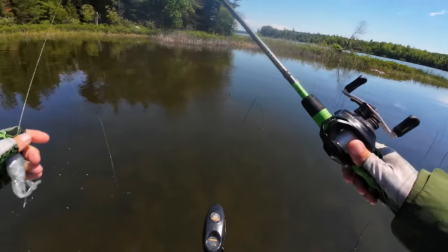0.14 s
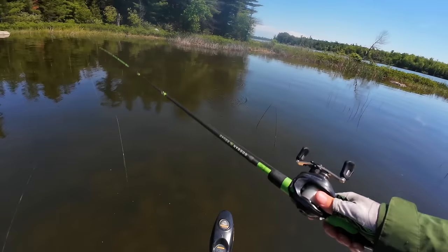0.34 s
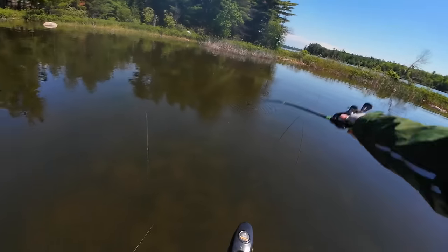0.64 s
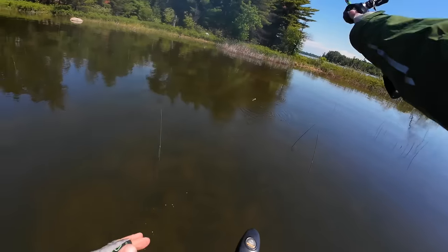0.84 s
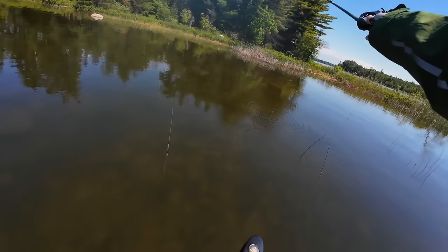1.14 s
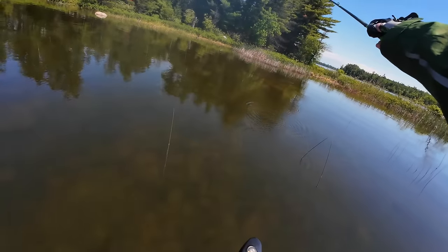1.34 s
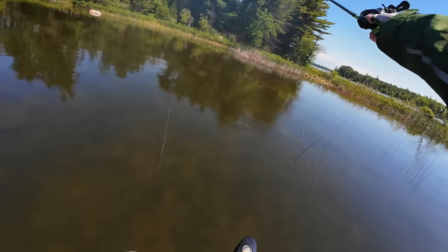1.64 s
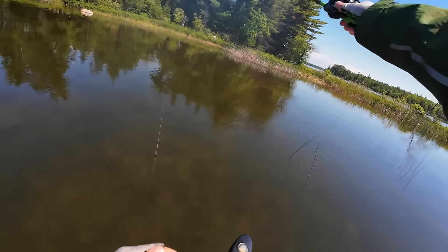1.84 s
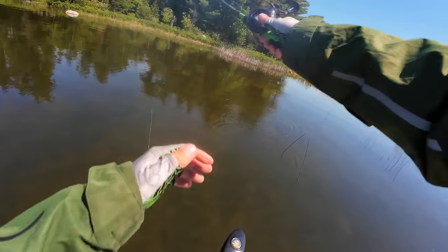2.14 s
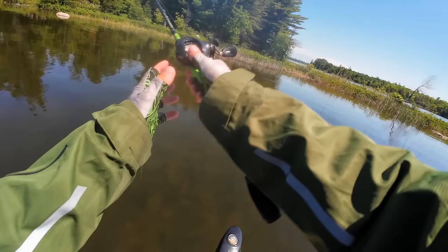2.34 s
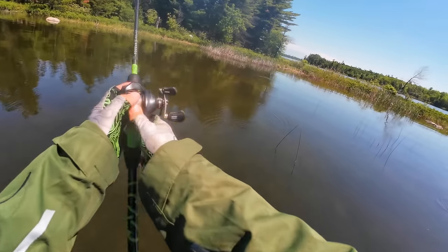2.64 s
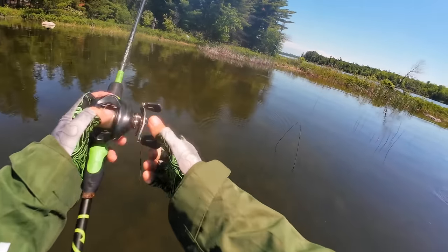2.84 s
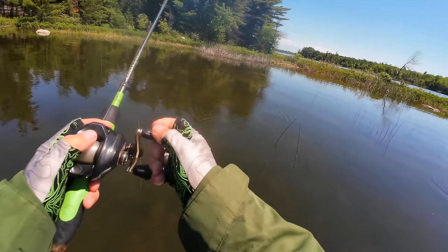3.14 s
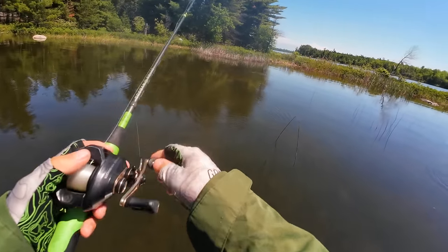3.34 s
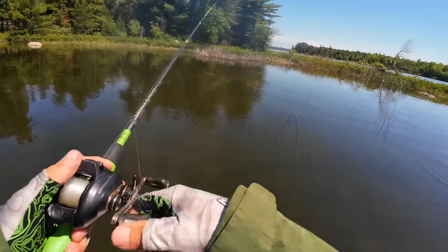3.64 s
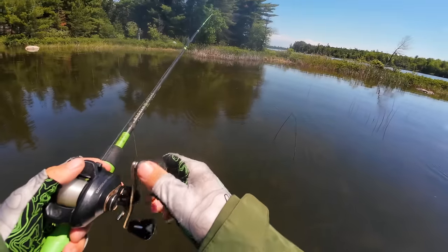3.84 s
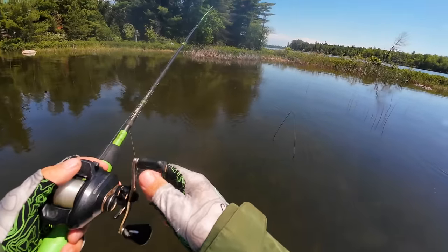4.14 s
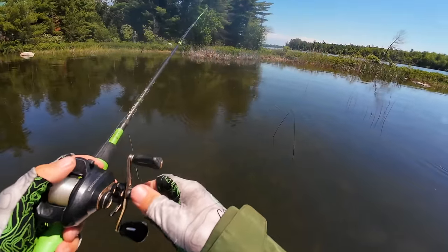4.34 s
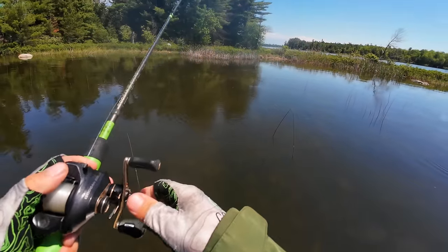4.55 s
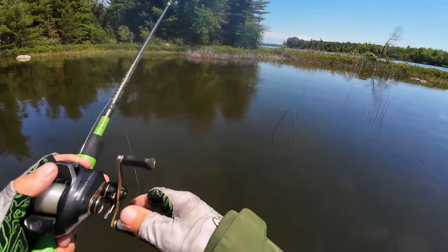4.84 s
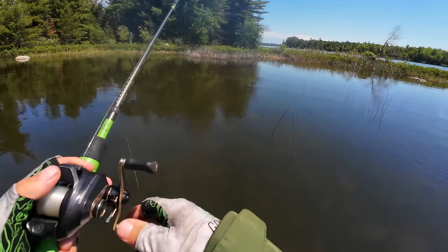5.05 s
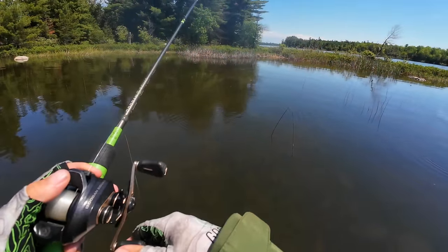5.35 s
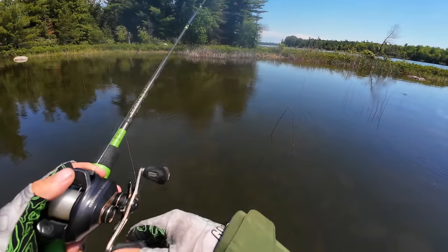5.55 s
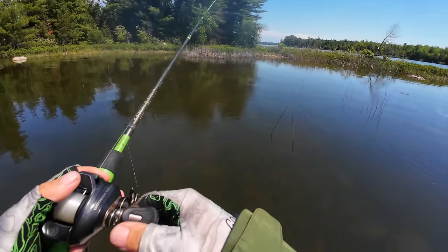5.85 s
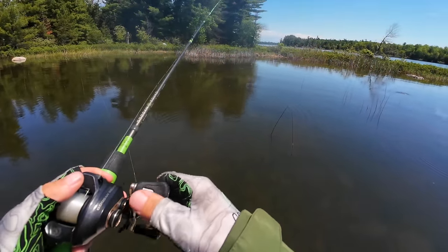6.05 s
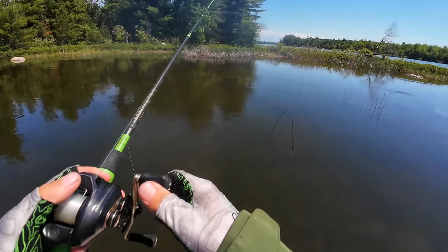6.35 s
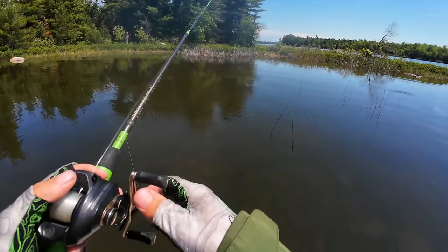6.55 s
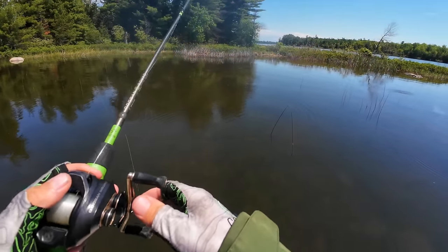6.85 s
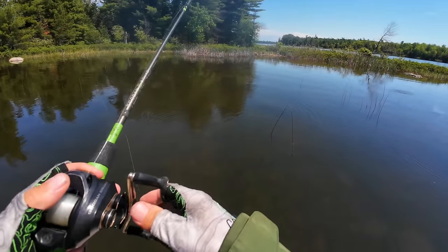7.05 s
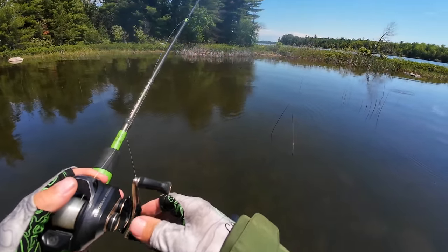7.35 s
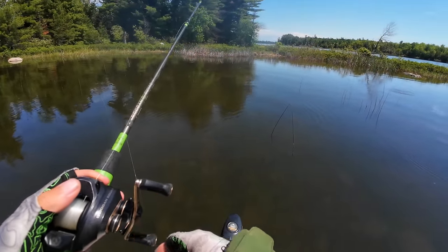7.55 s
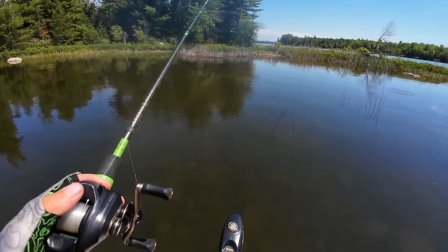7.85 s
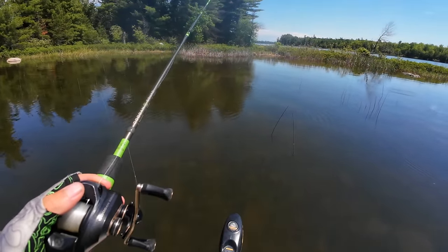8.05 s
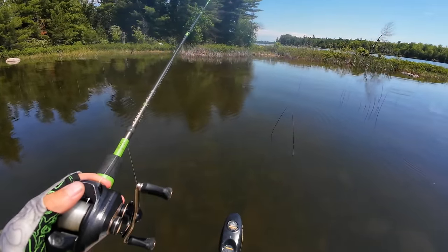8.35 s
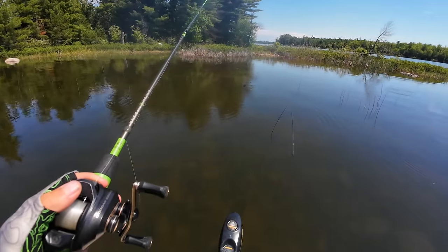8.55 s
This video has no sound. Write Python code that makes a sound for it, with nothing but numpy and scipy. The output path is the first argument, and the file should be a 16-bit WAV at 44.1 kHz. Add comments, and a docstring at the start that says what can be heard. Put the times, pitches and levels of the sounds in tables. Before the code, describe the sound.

A jacket rustles and a fishing rod swishes through a cast, with a dull thump against the body-worn microphone. Line hisses off the whirring spool for about a second. Fingers tap and sleeves shift, then the reel engages with one loud, sharp click. The lake turns quiet, and distant birds chirp and whistle quick two-note phrases over a faint low rumble, with a few light knocks.

```python
"""Casting on a still lake

A baitcasting rod is pitched from a boat, heard by a chest camera with two microphone ports.
Friction makes the jacket rustle and the line hiss off the spool under the thumb; impacts of fingers
and clutch ring the reel. Birds whistle on the wooded shore, which reflects their notes.
Air and body movement rumble in the ports."""
import sys
import numpy as np
from scipy import signal
from scipy.fft import rfft, irfft, next_fast_len
from scipy.io import wavfile
from scipy.ndimage import uniform_filter1d, map_coordinates

SR = 44100
rng = np.random.default_rng(int(sys.argv[2]) if len(sys.argv) > 2 else 0)


def persist_wave(psi):
    """Save psi, clipped to +-1, as 16-bit WAV."""
    counts = np.round(np.clip(psi, -1, 1) * 32767).astype(np.int16)
    wavfile.write(sys.argv[1], SR, np.atleast_2d(counts).T)


N = 383688
T = np.arange(N) / SR
IMPACT_T = T[:SR // 8]


def amp(db):
    """Decibels as an amplitude ratio."""
    return 10 ** (np.asarray(db) / 20)


def unit(x):
    """Normalisation to an rms of 1."""
    return x / np.sqrt(np.mean(x ** 2) + 1e-20)


def along(points, hz):
    """Interpolation of (frequency_hz, value) points on a logarithmic axis."""
    knots_hz, values = np.transpose(points)
    return np.interp(np.log(hz + 1), np.log(knots_hz + 1), values)


def curves(rows):
    """Linear envelopes, one for each column after the time."""
    times_s, *columns = np.transpose(rows)
    return [np.interp(T, times_s, column) for column in columns]


def wobble(rate_hz, n=N):
    """Smooth random modulation, n samples long."""
    return map_coordinates(rng.standard_normal(int(n * rate_hz / SR) + 4), [T[:n] * rate_hz])


def glide(pitches_hz, progress):
    """A parabolic glide through three pitches as progress runs from 0 to 1."""
    return np.polyval(np.polyfit([0, .5, 1], pitches_hz, 2), progress)


def add(track, start_s, sound):
    """Superposition of a sound on a track."""
    part = track[round(start_s * SR):][:len(sound)]
    part += sound[:len(part)]


def filtered(x, response):
    """Linear filtering by a complex frequency response."""
    size = next_fast_len(N + SR // 2)
    return irfft(rfft(x, size) * response(np.fft.rfftfreq(size, 1 / SR)), size)[..., :N]


def resonances(modes):
    """Frequency response of damped resonators summed with alternating sign."""
    return lambda hz: sum((-1) ** k * amp(db) * 1j * hz * width / (centre**2 - hz**2 + 1j * hz * width)
                          for k, (centre, width, db) in enumerate(modes))


def patchy(x, patch_db, bins, frames):
    """Spectral modulation: random gain patches, sized in 86 Hz bins and 6 ms frames."""
    spectra = signal.stft(x, nperseg=512)[2]
    field = uniform_filter1d(rng.standard_normal(spectra.shape[-2:]), bins, axis=0)
    field = uniform_filter1d(field, frames, axis=1)
    return signal.istft(spectra * amp(patch_db * unit(field)), nperseg=512)[1][..., :N]


def noise(spectrum, correlation, grain_db, patch_db):
    """Partly correlated stereo noise of rms 1; grain_db adds crackle, patch_db shifting bands."""
    grains = rng.standard_normal((2, N)) * amp(grain_db * wobble(640))

    def response(hz):
        angle = np.arccos(np.clip(along(correlation, hz), -1, 1)) / 2
        return amp(along(spectrum, hz)) * [np.cos(angle), np.sin(angle)]
    mid, side = filtered(patchy(grains, patch_db, bins=6, frames=9), response)
    return unit(np.array([mid + side, mid - side]))


# Share of the phase lead and shading that acts between the ports: frequency_hz, share
PORT_SHARE = [(4000, 0.08), (7000, 0.42), (9500, 0.41), (15000, 1)]

def ports(x, lead_rad, shade_db):
    """Path difference and shadowing: the left port's phase and level part from the right's in treble."""
    def response(hz):
        share = np.array([[.5], [-.5]]) * along(PORT_SHARE, hz)
        return amp(share * shade_db) * np.exp(1j * share * lead_rad)
    return filtered(x, response)


# Spectrum of the far shore: frequency_hz, gain_db
HUSH_SPECTRUM = [(40, -22), (60, 10.5), (130, -3), (280, -8.5), (550, -16.5), (1100, -21), (2400, -25),
                 (3500, -19), (4300, -22.5), (7000, -32.5), (11500, -28.5), (13300, -19.5), (14300, -33.5),
                 (15200, -67.5)]
# Its likeness at the two ports: frequency_hz, correlation
HUSH_CORRELATION = [(60, 0.44), (180, 0.2), (550, 0.2), (1650, 0.63), (4970, 0.54), (15000, -0.37)]

def shore_hush():
    """Distant sound arrives as nearly steady noise, only partly coherent between the ports."""
    hush = noise(HUSH_SPECTRUM, HUSH_CORRELATION, grain_db=-1.5, patch_db=2.1)
    return amp(-64.5 + 0.54 * wobble(12)) * hush


# Air and body movement on the ports: time_s, level_db
BUFFET_LEVELS = [(0.0, -42), (0.51, -49), (0.56, -35), (0.94, -38.5), (0.99, -37.5), (1.04, -39.5),
                 (1.43, -47.5), (1.65, -35.5), (1.79, -52.5), (1.84, -46), (2.3, -31), (2.35, -42),
                 (2.78, -46), (2.88, -35.5), (3.51, -53), (3.85, -44.5), (4.26, -55.5), (4.46, -40.5),
                 (4.56, -53), (4.68, -43), (4.72, -51.5), (7.17, -50.5), (7.27, -57), (7.8, -49.5),
                 (7.95, -32), (8.07, -38), (8.12, -47.5), (8.41, -43.5), (8.53, -54), (8.7, -42.5)]
# Spectrum of that pressure: frequency_hz, gain_db
BUFFET_SPECTRUM = [(8.8, -24), (15, 5.5), (36, -5.5), (45, -10), (59, -27), (92, -39), (200, -38.5),
                   (260, -54.5), (440, -120)]

def buffet():
    """Low pressure fluctuations, partly in antiphase; a stronger push favours the left port more."""
    db, = curves(BUFFET_LEVELS)
    pan_db = 5.5 + 0.7055 * (db + 53.5)
    balance = amp(np.array([pan_db, -pan_db]) / 2)
    lumps = amp(2.5 * wobble(12))
    rumble = noise(BUFFET_SPECTRUM, [(30, -0.5), (150, -0.19)], grain_db=-2, patch_db=0.5)
    return amp(db + 2) * lumps * balance * rumble


# Jacket movement: time_s, level_db, relative_treble_db
SLEEVE_LEVELS = [(0.0, -62, -3), (0.256, -70, 1.5), (0.39, -63, 0.5), (0.526, -63, -6.5), (0.744, -50, -3),
                 (0.824, -54.5, 14.5), (0.97, -58.5, 11), (1.04, -64, 4.5), (1.4, -72.5, 15.5),
                 (1.92, -69.5, 11), (1.954, -64.5, -0.5), (2.084, -57, 3), (2.226, -54, -2),
                 (2.746, -56, 7.5), (3.08, -61.5, 1.5), (3.17, -68.5, 3.5), (3.62, -56, 3.5),
                 (3.69, -60.5, -0.5), (3.95, -66.5, 6.5), (4.03, -73, -1.5), (4.45, -73, 8.5),
                 (4.68, -80, -10), (5.66, -72.5, 6), (5.89, -77.5, -6), (6.12, -79, 11.5),
                 (6.26, -79.5, -9.5), (7.4, -75.5, -8), (7.5, -74, 6.5), (7.56, -62, 1), (7.66, -56.5, 3.5),
                 (7.8, -58, 4), (7.97, -62, 5), (8.1, -71.5, 5), (8.31, -65, -6.5), (8.42, -69.5, -2),
                 (8.7, -73.5, -7.5)]
# Spectra of fabric folding, popping and sliding: frequency_hz, gain_db
FOLD_SPECTRUM = [(35, -42.5), (60, 9.5), (190, -10), (346, -6), (681, -8.5), (937, -8), (1810, -11),
                 (2910, -10.5), (7000, -21.5), (9100, -28.5), (15400, -120)]
CREASE_SPECTRUM = [(150, -38.5), (400, -3), (1000, -5), (2500, -15.5), (6000, -16.5), (12000, -44.5)]
SHEEN_SPECTRUM = [(3000, -46.5), (5000, -6), (7000, -10), (10000, -3.5), (13500, -2.5), (14500, -6),
                  (15600, -54.5)]

def sleeves():
    """Friction and buckling: coated fabric folds dully, pops at creases and slides with a sheen."""
    db, treble_db = curves(SLEEVE_LEVELS)
    folds = noise(FOLD_SPECTRUM, [(100, 0.37), (600, 0.85), (7000, 0.75)], grain_db=-1.5, patch_db=2.2)
    folds *= amp(db + 5.5 + 1.2 * wobble(30))
    pops_per_s = 120 * np.clip((db + 68) / 12, 0, 1)  # only brisk movement pops the creases
    sizes = amp(3 * np.minimum(rng.exponential(size=N), 2)) * np.clip(rng.standard_normal(N), -1.5, 1.5)
    pops = (rng.random(N) < pops_per_s / SR) * sizes
    creases = amp(db - 14.5) * unit(filtered(pops, lambda hz: amp(along(CREASE_SPECTRUM, hz))))
    sheen = noise(SHEEN_SPECTRUM, [(5000, 0.57)], grain_db=1, patch_db=3.5)
    sheen *= amp(db + treble_db - 1.5 + 1.3 * wobble(25))
    return (folds + creases) * amp([[.8], [-.8]]) + ports(sheen, lead_rad=-3.5, shade_db=-3.5)


def tick():
    """A broadband transient: differentiated noise, bright and quickly damped."""
    t = IMPACT_T
    envelope = np.clip(t / 0.00031, 0, 1) * amp(-60 * t / 0.026)
    return 0.86 * envelope * np.diff(rng.standard_normal(len(t) + 1))


def knock(hz, t60_s, attack_s, suboctave=0):
    """Impact excites a damped mode, a snap and a tick; the longer the ring, the weaker the snap."""
    t = IMPACT_T
    ring = amp(-60 * t / t60_s) * (np.sin(2 * np.pi * hz * t) + suboctave * np.sin(np.pi * hz * t))
    span = round(SR / (2.2 * max(hz, 900)))
    dull_noise = unit(uniform_filter1d(uniform_filter1d(rng.standard_normal(len(t)), span), span))
    snap = 0.0066 / t60_s * amp(-60 * t / 0.0095) * dull_noise
    return np.clip(t / attack_s, 0, 1) * (ring + snap) + amp(-29) * tick()


# Knocks of fingers, seams and buckles: start_s, level_db, pitch_hz
FINGER_TAPS = [(0.044, -38.5, 930), (0.137, -39.5, 1160), (0.405, -32.5, 590), (0.62, -34, 700),
               (0.677, -31.5, 500), (0.678, -38, 2420), (0.717, -28.5, 573), (0.719, -34.5, 3400),
               (0.7256, -23, 710), (0.754, -34.5, 600), (0.782, -35.5, 466), (0.9535, -23, 1100),
               (0.955, -38, 1696), (0.958, -31.5, 620), (1.079, -44.5, 990), (1.544, -42, 300),
               (1.664, -47, 500), (1.667, -51.5, 3500), (1.689, -53, 1400), (2.064, -32.5, 766),
               (2.2, -36, 860), (2.2019, -30, 1810), (2.239, -36, 910), (2.274, -37, 601),
               (2.348, -35, 848), (2.382, -36, 481.5), (2.412, -34.5, 440), (2.439, -32, 1780),
               (2.508, -26.5, 1510), (2.509, -36.5, 1010), (2.537, -35.5, 1500), (2.719, -34, 2040),
               (2.83, -32.5, 877), (2.854, -29.5, 1080), (3.451, -38.5, 1025), (3.579, -31, 990),
               (3.582, -34.5, 2290), (3.586, -35, 1710), (3.596, -40.5, 754), (3.708, -36, 2130),
               (3.708, -37, 804), (4.128, -48.5, 1500), (4.504, -43, 600), (8.307, -33.5, 1110)]

def taps():
    """Heavily damped impacts, each ring dying within ten cycles."""
    out = np.zeros(N)
    for start_s, db, hz in FINGER_TAPS:
        add(out, start_s, amp(db) * knock(hz, t60_s=min(0.0077, 9.6 / hz), attack_s=0.0014))
    return ports(out, lead_rad=4.6, shade_db=-10)


# Arm and strap bumping the camera: start_s, level_db, nominal_pitch_hz, decay_cycles
CAMERA_BUMPS = [(0.472, -40.5, 223, 10.5), (0.671, -22, 190, 1), (0.737, -9, 111, 1.5),
                (0.75, -22, 147, 8.5), (0.781, -29.5, 362, 14.5), (0.949, -35, 241, 15),
                (1.311, -37, 75, 7), (1.335, -29.5, 79, 7.5), (1.462, -33.5, 99, 9), (1.488, -23.5, 124, 8),
                (2.224, -36, 300, 4), (2.238, -31, 298, 6), (2.296, -29, 350, 6), (2.45, -32, 151, 6),
                (2.465, -29, 219, 6), (2.54, -31.5, 110, 5.5), (3.327, -36, 229, 5),
                (3.862, -31.5, 72.4, 9.5)]

def thumps():
    """Soft impacts give low damped oscillations that sag in pitch, stronger at the left port."""
    out, t = np.zeros(N), T[:SR // 5]
    for start_s, db, hz, decay_cycles in CAMERA_BUMPS:
        t60_s = decay_cycles / hz
        sag = 0.62 + 0.59 * np.exp(-t / (0.2 * t60_s))
        cycles = np.cumsum(hz * sag * (1 + 0.086 * wobble(67, len(t)))) / SR
        attack = np.clip(t / (0.099 * t60_s), 0, 1)
        decay = amp(db - 60 * t / t60_s + 2.06 * wobble(84, len(t)))
        add(out, start_s, -attack * decay * np.sin(2 * np.pi * cycles))
    return out * amp([[2.5], [-2.5]])


# Cloth sliding over an air pocket: start_s, length_s, first_hz, middle_hz, last_hz, level_db
CUFF_SLIDES = [(0.56, 0.304, 299.4, 380, 327, -46.5), (1.549, .04, 350, 404, 350, -57),
               (7.481, 0.26, 420, 560, 750, -61), (7.601, 0.3, 1080, 1014, 721, -51),
               (7.598, 0.3, 1750, 1700, 1615, -59), (8.166, 0.094, 650, 620, 695, -55),
               (8.197, 0.11, 2300, 2240, 2070, -59.5), (8.249, 0.091, 1148, 1120, 1100, -62),
               (8.45, 0.13, 264, 253.5, 220, -55)]

def cuff(width_hz=260):
    """Cavity resonance: narrowband noise follows the pitch of the air pocket, swelling and fading."""
    out = np.zeros(N)
    for start_s, length_s, *pitches_hz, db in CUFF_SLIDES:
        n = round(length_s * SR)
        progress = np.linspace(0, 1, n)
        phase = 2 * np.pi * np.cumsum(glide(pitches_hz, progress)) / SR
        band = wobble(width_hz, n) * np.cos(phase) + wobble(width_hz, n) * np.sin(phase)
        add(out, start_s, amp(db - 3.5) * np.sin(np.pi * progress) * band)
    return out


# The rod cutting the air and a sleeve sweeping past: start_s, rise_s, fall_s, level_db
SWEEPS = [(0.625, 0.045, 0.48, -51), (.8, 0.17, 0.03, -51), (2.12, 0.1, 0.39, -61),
          (2.62, 0.13, 0.17, -50.5)]
# Spectrum of the rushing air: frequency_hz, gain_db
SWISH_SPECTRUM = [(300, -20), (800, -1.5), (2500, -3), (3500, -0.5), (6000, -5.5), (7200, -4), (15000, -28)]

def swishes():
    """Aerodynamic noise: a mid-band rush swells and fades with each sweep."""
    envelope = sum(amp(db) * np.interp(T, start_s + np.cumsum([0, rise_s, fall_s]), [0, 1, 0])
                   for start_s, rise_s, fall_s, db in SWEEPS)
    rush = noise(SWISH_SPECTRUM, [(1000, 1.0), (6000, 0.57)], grain_db=1, patch_db=-0.5)
    return envelope * amp(1.6 * wobble(39.5)) * rush


# Line slipping under the thumb: start_s, length_s, first_db, last_db
LINE_SLIPS = [(0.773, 0.193, -59, -36.5), (1.059, 0.039, -37, -38.5), (1.131, 0.042, -35, -54),
              (1.3045, 0.007, -37, -40), (1.3125, 0.015, -39, -35), (1.353, 0.051, -37, -40),
              (1.405, 0.056, -40, -38), (1.462, 0.43, -37.5, -40), (1.889, 0.04, -42, -49),
              (1.939, 0.0065, -38, -46)]
# The free spool ticking between slips: start_s, length_s, rotation_hz
SPOOL_COAST = (1.175, .12, 105)
# Resonances of spool and guides: centre_hz, width_hz, gain_db
SPOOL_MODES = [(5280, 1100, -2.5), (6550, 770, -4), (8070, 740, -2.5), (10330, 590, 4.5), (11550, 730, 6),
               (12400, 630, 6), (13450, 590, 6), (14300, 1300, -5), (15500, 900, -5)]

def line():
    """Sliding friction: braided line rubs the thumb in sudden runs, and its grains ring the spool."""
    envelope = np.zeros(N)
    for start_s, length_s, first_db, last_db in LINE_SLIPS:
        t = T[:round(length_s * SR)]
        edges = np.clip(np.minimum(t / 0.0014, (length_s - t) / 0.0054), 0, 1)
        add(envelope, start_s, edges * amp(first_db + (last_db - first_db) * t / length_s))
    start_s, length_s, rotation_hz = SPOOL_COAST
    add(envelope, start_s, amp(-53) * np.sin(np.pi * rotation_hz * T[:round(length_s * SR)]) ** 4)
    grains = rng.standard_normal(N) * amp(1.1 * wobble(980) + 0.47 * wobble(120))
    spool = lambda hz: resonances(SPOOL_MODES)(hz) * hz ** 8 / (hz ** 8 + 4700. ** 8)  # high-passed
    rub = envelope * unit(filtered(patchy(grains, patch_db=2.5, bins=7, frames=12), spool))
    scatter = amp(-9.5) * envelope * unit(filtered(rng.standard_normal((2, N)), spool))
    return ports(rub, lead_rad=-4, shade_db=-8.5) + scatter


# Spool bearings under load: time_s, level_db
BEARING_LEVELS = [(1.05, -68), (1.084, -45.5), (1.116, -56), (1.156, -54.5), (1.26, -68), (1.35, -62),
                  (1.4, -58), (1.83, -57.5), (1.908, -51.5), (1.98, -65)]
# Their resonances: centre_hz, width_hz, gain_db
BEARING_MODES = [(1820, 90, 0), (2130, 70, -0.5), (2260, 80, 1), (3050, 520, 5)]

def bearings():
    """Forced vibration: the spinning spool shakes its bearings into a whirr."""
    db = np.interp(T, *np.transpose(BEARING_LEVELS), left=-120, right=-120)
    shake = patchy(rng.standard_normal(N) * amp(1.5 * wobble(280)), patch_db=5.5, bins=3, frames=12)
    whirr = filtered(shake, resonances(BEARING_MODES))
    return amp(db - 3) * unit(filtered(whirr, resonances([(2465, 3600, 0)])))


# Clutch parts striking: start_s, level_db, thump_db, tilt_db_per_octave
CLUTCH_STRIKES = [(3.0636, -25, -52.5, -6), (3.0752, -14, -51.5, 0.5), (3.0779, -3, -7.5, 2),
                  (3.083, -23, -61.5, -5.5), (3.0908, -29.5, -61.5, -5.5), (3.0942, -12, -42.5, -3)]
# Modes of the reel frame: pitch_hz, level_db, t60_s
FRAME_MODES = [(520, -12.5, 0.0052), (930, -25, 0.062), (1500, -9.5, .006), (1800, -6.5, 0.0076),
               (2790, -12, 0.017), (3430, 5, 0.0052), (3770, -12.5, 0.01), (4950, -13, 0.011),
               (6560, -1, 0.0054), (9400, -1.5, 0.0059), (11300, 8, 0.0038), (14800, -11.5, 0.0019)]

def clutch():
    """Modal ringing: each part strikes the frame; the hardest click comes with a short, low thump."""
    out, t = np.zeros(N), IMPACT_T
    thump = 0.48 * np.exp(-t / 0.009) * np.clip(t / 0.001, 0, 1)
    thump -= np.sin(np.pi * np.clip(t / 0.0017, 0, 1))
    for start_s, db, thump_db, tilt_db in CLUTCH_STRIKES:
        ring = np.zeros(len(t))
        for hz, mode_db, t60_s in FRAME_MODES:
            struck_db = mode_db + tilt_db * np.log2(hz / 3000) + rng.uniform(-0.3, 1)
            ring += amp(struck_db - 60 * t / t60_s) * np.sin(2 * np.pi * hz * t)
        crack = 1.6 * amp(2 * tilt_db - 60 * t / 0.005) * rng.standard_normal(len(t))
        rattle = 0.095 * amp(-60 * t / 0.092) * uniform_filter1d(rng.standard_normal(len(t)), size=3)
        attack = np.clip(t / 0.00082, 0, 1)
        add(out, start_s, amp(db - 3.5) * attack * (ring + crack + rattle) + amp(thump_db) * thump)
    return ports(out, lead_rad=4.5, shade_db=-7)


def whistle(length_s, pitches_hz, rise=.35, fall=.35, jitter=0, dip=0, dip_s=.004, hoarse=False):
    """A gliding tone whose pitch dips as the beak shuts, or, if hoarse, scoops up over an undertone."""
    n = round((length_s + 0.0081) * SR)
    progress = np.linspace(0, 1, n)
    from_edge_s = (progress if hoarse else 1 - progress) * length_s
    hz = glide(pitches_hz, progress) * (1 - dip * np.exp(-from_edge_s / dip_s))
    hz *= 1 + jitter * uniform_filter1d(rng.standard_normal(n), size=90) * 90 ** .5
    tone = np.sin(2 * np.pi * np.cumsum(hz) / SR)
    if hoarse:
        under_hz = .945 * hz * (1 - .06 * np.exp(-from_edge_s / .004) + .02 * wobble(400, n))
        tone += amp(-7) * np.exp(-from_edge_s / .018) * np.sin(2 * np.pi * np.cumsum(under_hz) / SR)
    return np.clip(progress / rise, 0, 1) * np.clip((1 - progress) / fall, 0, 1) * tone


HOARSE_VOICE = dict(rise=.05, jitter=.008, dip=.035, hoarse=True)
NOTE_LEAD_S = .006
# Scattered bird calls and their faint echoes: start_s, length_s, first_hz, middle_hz, last_hz, level_db
CALLS_AND_ECHOES = [(4.156, 0.03, 3250, 2760, 2350, -70), (4.198, 0.02, 2650, 2900, 3150, -66),
                    (4.221, 0.008, 3100, 2880, 2650, -71), (4.244, 0.038, 2600, 2720, 3350, -67),
                    (4.303, 0.018, 3700, 3850, 3850, -67), (4.328, 0.014, 3800, 3820, 3750, -70),
                    (4.34, 0.022, 3400, 2950, 2550, -70), (4.42, 0.07, 9300, 8300, 6900, -67),
                    (4.69, 0.04, 3500, 3800, 3700, -72), (4.91, 0.025, 3750, 3650, 3600, -72),
                    (5.046, 0.032, 3400, 2960, 3200, -63), (5.076, 0.024, 3150, 3500, 4000, -70),
                    (5.116, 0.028, 3450, 3200, 3050, -62), (5.174, 0.026, 2900, 2750, 2620, -68),
                    (5.203, 0.03, 2700, 2380, 2120, -71), (5.246, 0.022, 2680, 2830, 3400, -64),
                    (5.268, 0.016, 3300, 2830, 2750, -64), (5.29, 0.016, 2300, 2150, 2150, -71),
                    (6.188, 0.022, 3460, 3250, 2890, -59.5), (6.293, 0.017, 8100, 7600, 7300, -65),
                    (6.332, 0.022, 3440, 3130, 2910, -56), (6.364, 0.011, 2900, 3110, 3410, -61),
                    (6.39, 0.028, 3950, 3650, 3520, -65), (6.262, 0.014, 2850, 2900, 2880, -60),
                    (6.41, 0.11, 3150, 3130, 3150, -69), (6.675, 0.072, 8150, 8050, 7800, -64),
                    (6.26, .035, 8250, 8200, 8100, -69), (6.787, 0.114, 5260, 5260, 5250, -53),
                    (6.805, 0.114, 3280, 3300, 3300, -64), (7.035, 0.145, 6750, 6900, 6900, -63),
                    (5.41, .07, 2450, 2350, 2400, -67), (7.25, 0.057, 3660, 3570, 3600, -57),
                    (7.33, .03, 3600, 3580, 3600, -65), (7.37, .02, 3600, 3600, 3560, -67),
                    (7.4, .05, 3560, 3600, 3580, -65), (7.52, .04, 3560, 3540, 3520, -64),
                    (7.79, .03, 3560, 3600, 3640, -56), (8.345, .045, 3290, 3300, 3300, -68),
                    (7.43, 0.022, 3350, 3000, 2750, -62), (7.455, 0.025, 2950, 3000, 2950, -60),
                    (7.827, 0.027, 3640, 3580, 3590, -37.5), (7.87, 0.03, 3590, 3590, 3590, -51),
                    (7.91, 0.045, 3580, 3590, 3580, -54), (7.893, 0.036, 4040, 4000, 4040, -53),
                    (8.13, 0.09, 2480, 2470, 2500, -66), (8.18, 0.105, 3300, 3300, 3270, -60.5),
                    (8.455, 0.03, 3100, 2900, 2700, -68), (8.519, 0.025, 3230, 3160, 3170, -59.5),
                    (8.556, 0.022, 3290, 2980, 2910, -61), (8.632, 0.025, 3200, 2950, 2750, -65)]

def calls_and_echoes():
    """Frequency glides, voiced by register; yields (start_s, note, echo_gain)."""
    for start_s, length_s, *pitches_hz, db in CALLS_AND_ECHOES:
        middle_hz = pitches_hz[1]
        if middle_hz > 6300:
            voice, echo_gain = dict(fall=.1, jitter=.004, dip=.14, dip_s=.007), .35
        elif middle_hz > 4500:
            voice, echo_gain = HOARSE_VOICE, .7
        else:
            voice, echo_gain = dict(jitter=.004 if middle_hz > 3400 else 0), .35
        yield start_s - NOTE_LEAD_S, amp(db + 2) * whistle(length_s, pitches_hz, **voice), echo_gain


# A songbird's couplets: start_s, wait_s, high_hz, high_db, low_hz, low_db
COUPLETS = [(5.317, .1, 5820, -70, 2875, -59), (5.451, .071, 5590, -54.5, 2690, -48),
            (5.692, .098, 5750, -66, 2840, -60.5), (5.848, .076, 5530, -53.5, 2690, -48),
            (6.029, .091, 5740, -58.5, 2825, -60.5), (6.206, .075, 5470, -54.5, 2690, -47.5),
            (6.489, .071, 5470, -48.5, 2690, -48.5), (6.751, .076, 5460, -50, 2690, -47.5),
            (6.91, .054, 5380, -56.5, 2690, -49), (7.026, .058, 5350, -56.5, 2690, -49.5),
            (7.147, .054, 5370, -57, 2690, -49.5), (7.265, .044, 5380, -53, 2690, -46.5)]

def songbird(low_lead_s=.014, low_note_s=.025):
    """Tone pairs about an octave apart, high then low, strongly reflected by the trees around them."""
    for start_s, wait_s, high_hz, high_db, low_hz, low_db in COUPLETS:
        high = whistle(0.79 * wait_s, [high_hz] * 3, **HOARSE_VOICE)
        low = whistle(low_lead_s + low_note_s, [low_hz] * 3, rise=.8, fall=.1, dip=.14, dip_s=.002)
        yield start_s - NOTE_LEAD_S, amp(high_db + 2) * high, .7
        yield start_s - NOTE_LEAD_S + wait_s - low_lead_s, amp(low_db + 2) * low, 1.15


# Dry ticks: start_s, level_db
DRY_TICKS = [(5.574, -41), (5.652, -45)]

def dry_ticks():
    """Transients without resonance have no pitch."""
    out = np.zeros(N)
    for start_s, db in DRY_TICKS:
        add(out, start_s, amp(db) * tick())
    return ports(out, lead_rad=4.6, shade_db=-10)


# Knocks on something hollow: start_s, level_db, pitch_hz, upper_modes_db
HOLLOW_KNOCKS = [(5.648, -46.5, 778, -64), (5.656, -45, 666, -65), (7.222, -35, 934, -32)]
# Its upper modes: pitch_hz, level_db
HOLLOW_MODES = [(1800, -15), (2200, -9.5), (2500, -12), (2900, -14)]

def hollow_knocks():
    """Light damping lets a hollow body ring; its upper modes die sooner."""
    out, t = np.zeros(N), IMPACT_T
    upper_attack = np.clip(t / 0.0017, 0, 1)
    for start_s, db, hz, upper_db in HOLLOW_KNOCKS:
        add(out, start_s, amp(db) * knock(hz, t60_s=0.068, attack_s=0.0042, suboctave=0.28))
        for mode_hz, mode_db in HOLLOW_MODES:
            decay = amp(upper_db + mode_db + 1.2 * wobble(530, len(t)) - 60 * t / 0.037)
            add(out, start_s + 0.00198, upper_attack * decay * np.sin(2 * np.pi * mode_hz * t))
    return ports(out, lead_rad=4.6, shade_db=-10)


# Buzzed bird notes: start_s, length_s, pitch_hz, buzz_hz, roughness, level_db
BUZZED_NOTES = [(6.382, 0.14, 4643, 334, 0.1, -47.5), (7.383, 0.27, 4530, 142, 0.55, -57.5)]

def buzzes():
    """Fast frequency modulation gives a whistle sidebands, heard as a buzz."""
    for start_s, length_s, hz, buzz_hz, roughness, db in BUZZED_NOTES:
        t = T[:round(length_s * SR)]
        drift_hz = 35 * wobble(41.4, len(t)) + 300 * roughness * wobble(900, len(t))
        phase = 2 * np.pi * np.cumsum(hz + drift_hz) / SR + 0.5 * np.sin(2 * np.pi * buzz_hz * t)
        envelope = np.clip(np.minimum(t, length_s - t) / (0.16 * length_s), 0, 1)
        yield start_s, amp(db) * envelope * np.sin(phase), .5


# Reflections from stands of trees: delay_s, level_db
TREE_ECHOES = [(.043, -6), (.078, -17), (.11, -19)]

def across_lake(notes, t60_s=0.5, foliage_cutoff_hz=6300):
    """Propagation: air over the water makes notes flutter; the woods scatter them and absorb treble."""
    direct, to_woods = np.zeros((2, N))
    for start_s, note, echo_gain in notes:
        add(direct, start_s, note)
        add(to_woods, start_s, echo_gain * note)
    direct *= amp(3 * wobble(55) + .8 * wobble(300))
    t = T[:SR // 2]
    woods = amp(-32.5 - 60 * t / t60_s) * np.clip(t / 0.016, 0, 1) * rng.standard_normal((2, len(t)))
    for delay_s, db in TREE_ECHOES:
        for channel in woods:
            add(channel, delay_s - .002, amp(db - 21) * unit(rng.standard_normal(round(.006 * SR))))
    echo = signal.fftconvolve(to_woods[None], woods, axes=1)[:, :N]
    echo = filtered(echo, lambda hz: 1 / (1 + (hz / foliage_cutoff_hz) ** 12))
    return ports(direct + echo, lead_rad=5, shade_db=-3.5)


def scene():
    """Superposition: the pressures of all sources add at the two ports."""
    background = shore_hush() + buffet()
    angler = sleeves() + taps() + thumps() + cuff()
    cast = swishes() + line() + bearings() + clutch()
    birds = across_lake([*calls_and_echoes(), *songbird(), *buzzes()])
    return background + angler + cast + birds + dry_ticks() + hollow_knocks()


def record(dry, cutoff_hz=15800):
    """Soft saturation rounds peaks near full scale, and a steep low-pass limits the bandwidth."""
    limited = dry / (1 + np.abs(dry) ** 8) ** (1 / 8)
    return filtered(limited, lambda hz: 1 / (1 + (hz / cutoff_hz) ** 120))


dry = scene()
out = record(dry)
persist_wave(out)
```